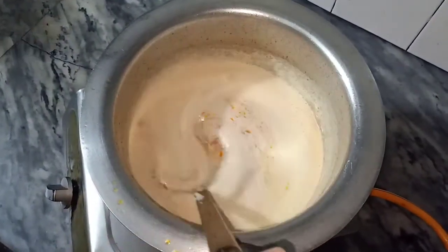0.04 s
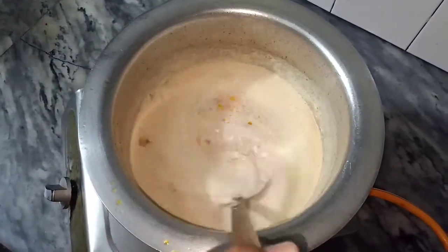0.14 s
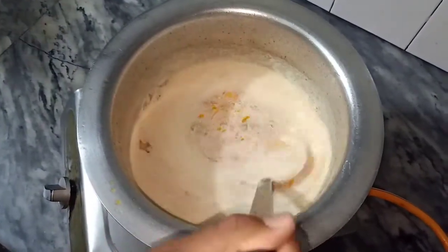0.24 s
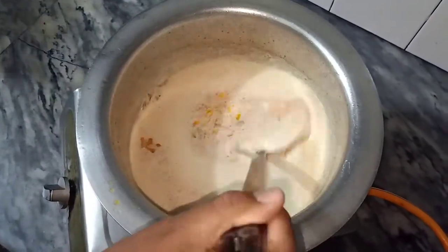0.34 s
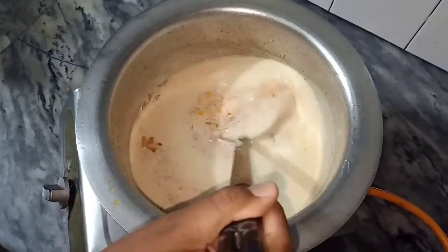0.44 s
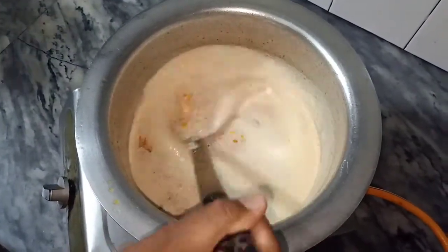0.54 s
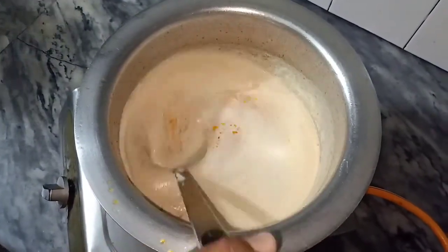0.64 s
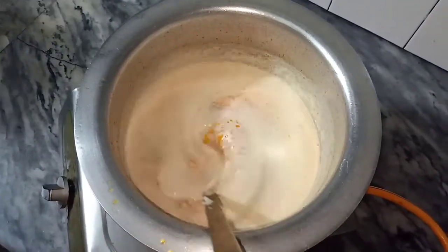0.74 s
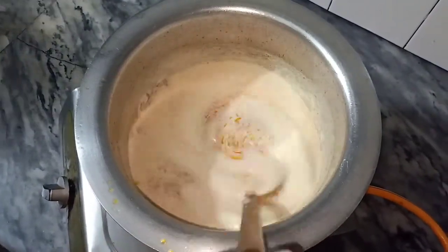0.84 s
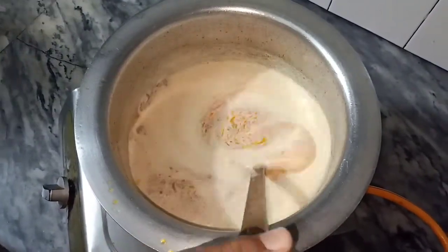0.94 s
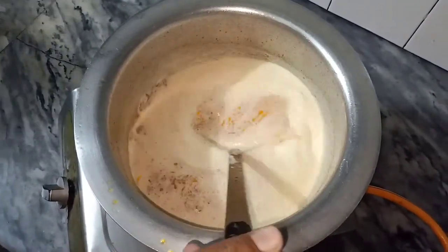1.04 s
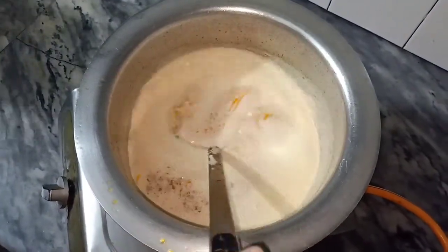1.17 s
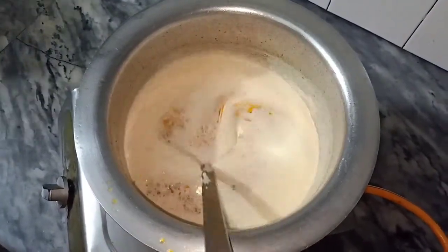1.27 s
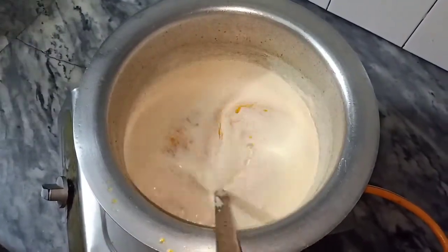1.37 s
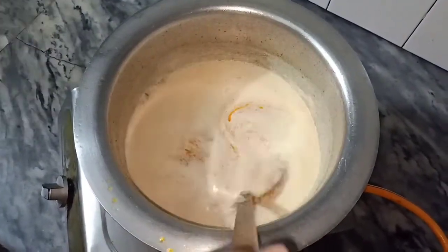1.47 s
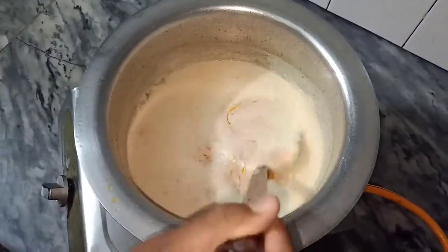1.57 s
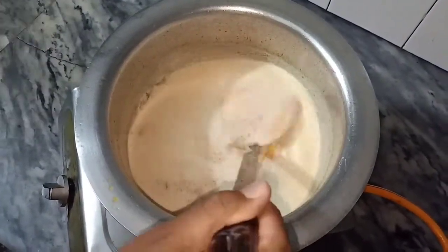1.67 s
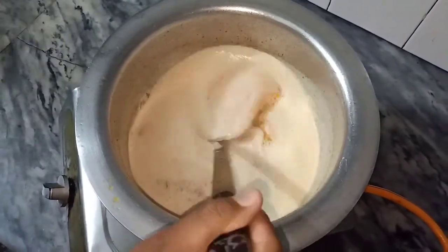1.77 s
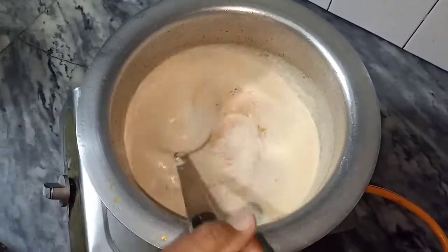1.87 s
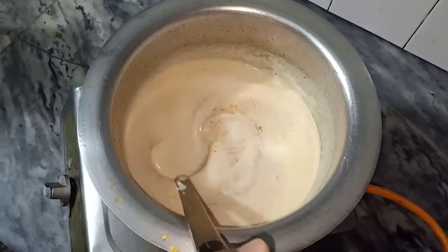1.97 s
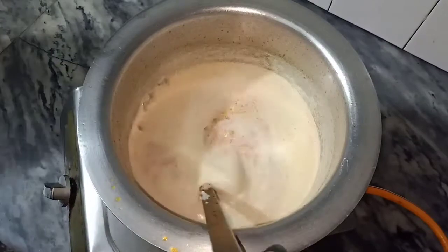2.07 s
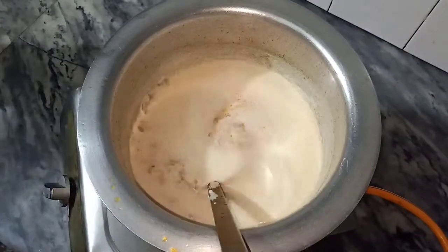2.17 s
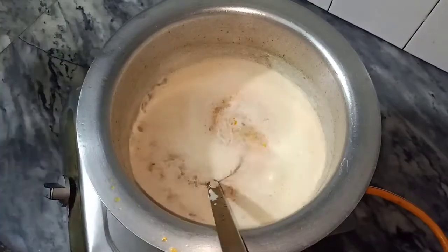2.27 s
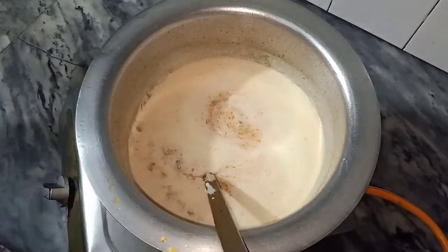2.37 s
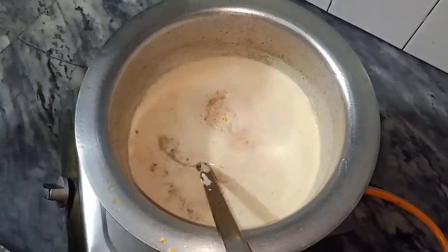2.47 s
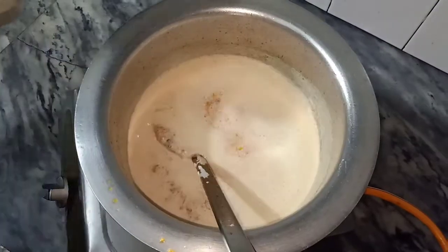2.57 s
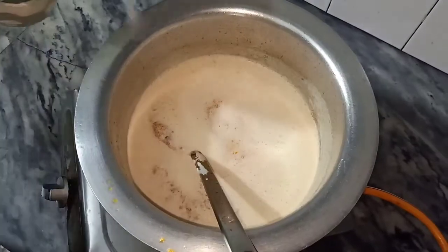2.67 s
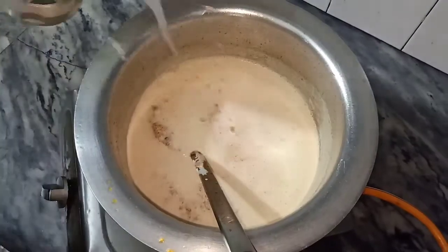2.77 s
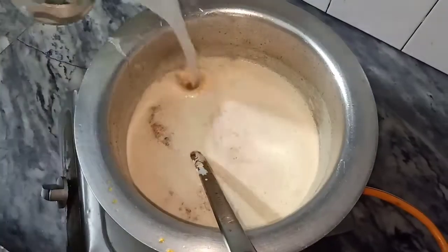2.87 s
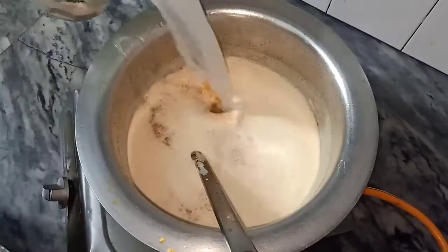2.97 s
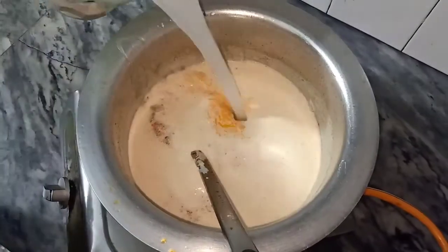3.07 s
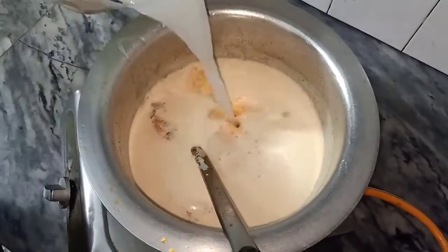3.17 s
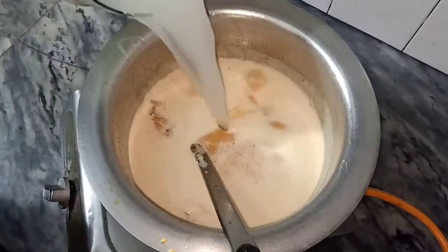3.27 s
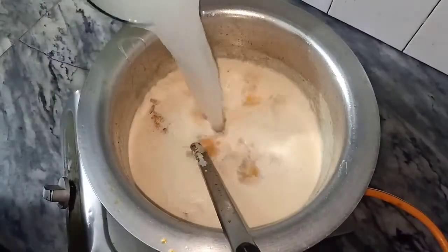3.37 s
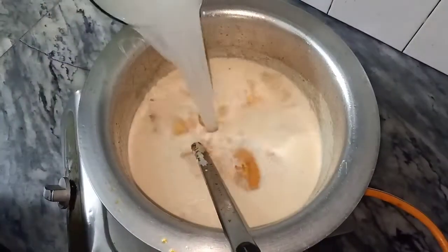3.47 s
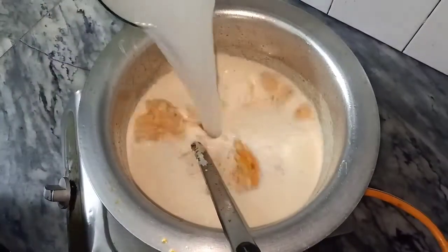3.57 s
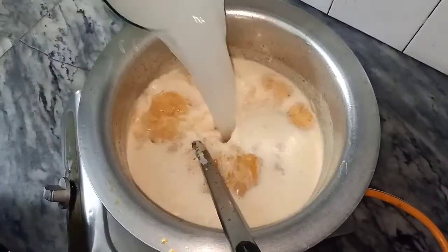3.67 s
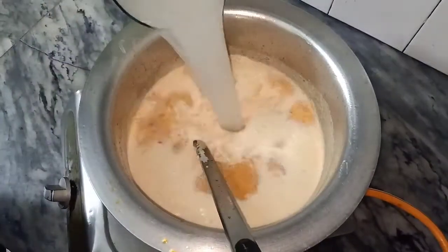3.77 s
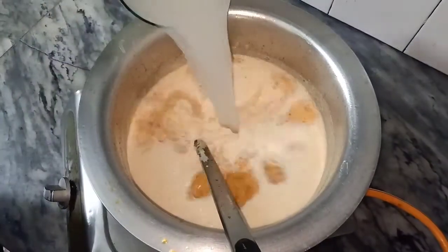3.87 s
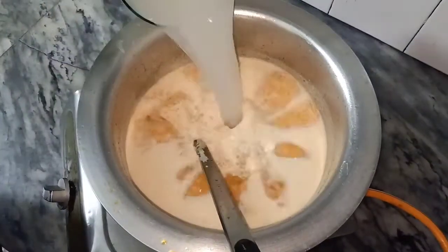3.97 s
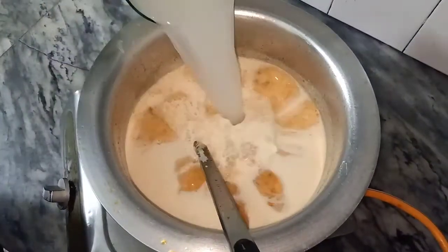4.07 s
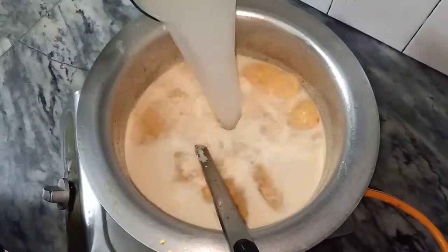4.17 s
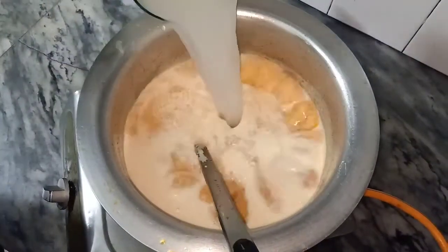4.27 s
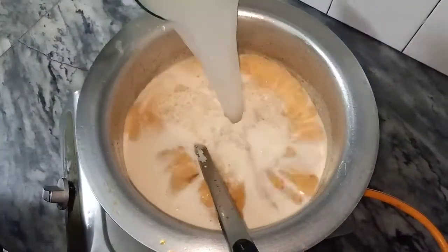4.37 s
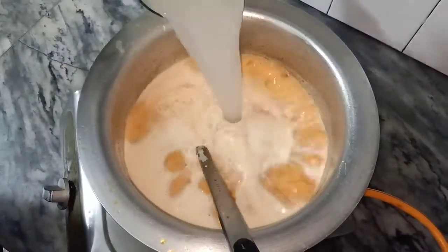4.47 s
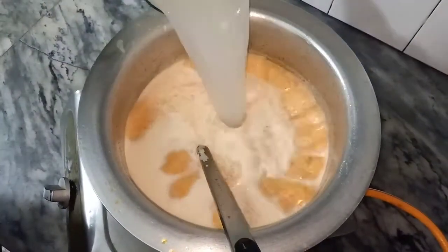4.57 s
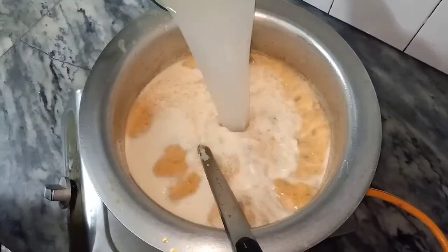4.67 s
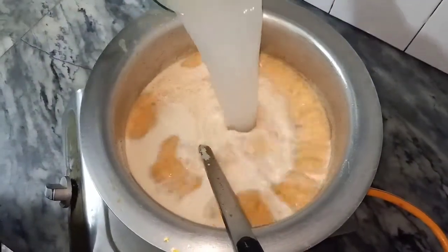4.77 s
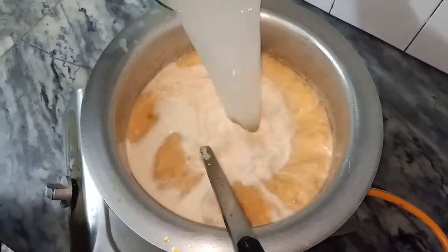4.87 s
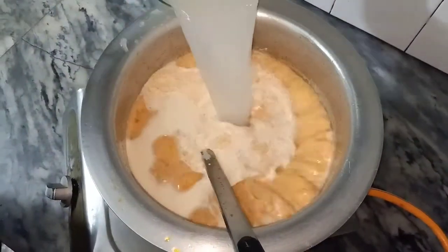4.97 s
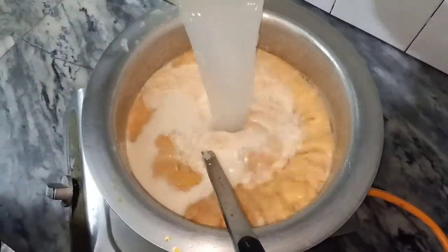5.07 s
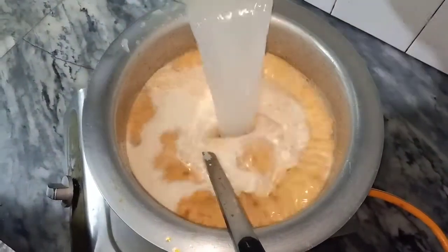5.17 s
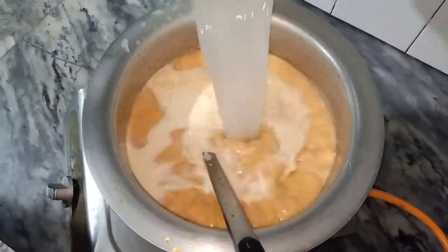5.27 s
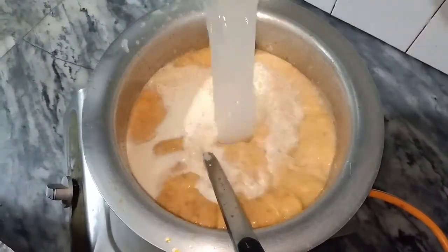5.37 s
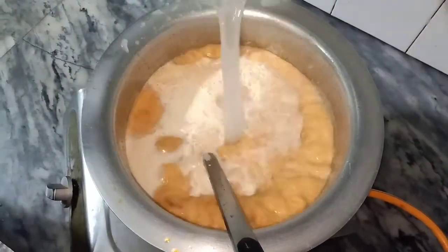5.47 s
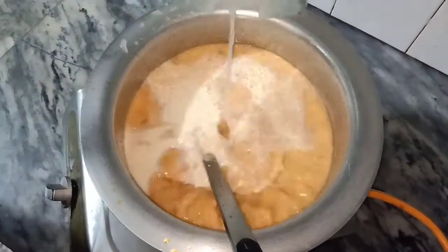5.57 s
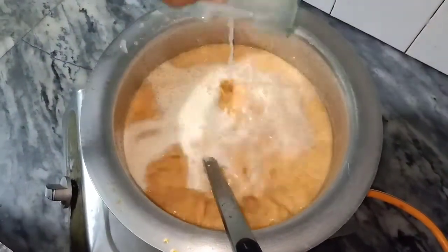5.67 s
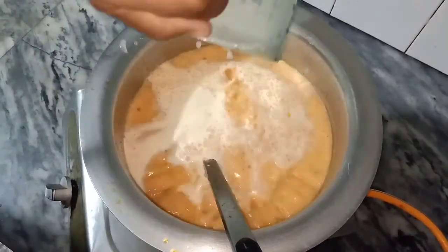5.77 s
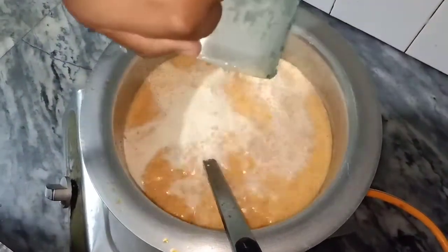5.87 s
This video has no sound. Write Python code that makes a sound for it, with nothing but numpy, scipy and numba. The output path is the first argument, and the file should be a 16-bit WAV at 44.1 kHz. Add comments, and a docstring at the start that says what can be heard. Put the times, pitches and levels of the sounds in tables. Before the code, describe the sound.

A ladle scrapes and knocks softly in a steel pot of thick liquid, then water pours in with splashes, glugs and one hard metallic clang.

```python
"""A hard kitchen: a ladle scrapes and knocks in a steel pot of thick liquid, close to a phone, then water is
poured in from a jug. Uneven slips ring the pot's damped resonances, and struck modes with a short rattle make
the knocks, one of them a hard clang. The water is swarms of gliding bubbles with splashes and big glugs on top.
Hiss and a low rumble lie behind. The left microphone port faces away and hears it all duller."""
import sys
import numpy as np
from scipy import signal
from scipy.fft import rfft, irfft
from scipy.io import wavfile
from numba import njit

SR = 44100
rng = np.random.default_rng(int(sys.argv[2]) if len(sys.argv) > 2 else 0)


def wrap_up_sound(samples):
    """Save the sound to the file named by the first command line argument, as 16-bit audio."""
    columns = np.atleast_2d(samples).T
    # keep every value between -1 and 1, then stretch to whole-number steps
    tamed = np.clip(columns, -1, 1)
    steps = np.round(tamed * 32767).astype(np.int16)
    wavfile.write(sys.argv[1], SR, steps)


N = 261954
T = np.arange(N) / SR
HZ = np.maximum(np.fft.rfftfreq(N, 1 / SR), 1)


def undb(db):
    """Decibels to a gain."""
    return 10 ** (np.asarray(db) / 20)


def unit(x):
    """Scale to rms 1."""
    return x / np.sqrt(np.mean(x ** 2))


def over_hz(table):
    """A (Hz, value) table read at every frequency, straight lines over log frequency."""
    hz, value = np.transpose(table)
    return np.interp(np.log(HZ), np.log(hz), value)


def colour(x, table):
    """Filter by a (Hz, dB) spectrum; rms 1."""
    return unit(irfft(rfft(x) * undb(over_hz(table)), N))


def causal(db):
    """Response with these levels that rings only after the sound (minimum phase)."""
    fold = irfft(np.log(undb(db)), N)
    fold[..., 1:N // 2] *= 2
    fold[..., N // 2 + 1:] = 0
    return np.exp(rfft(fold))


def band(x, lo_hz, hi_hz, order=2):
    """Keep one band of frequencies."""
    return signal.sosfilt(signal.butter(order, (lo_hz, hi_hz), "band", fs=SR, output="sos"), x)


def wander(rate):
    """Random levels 1 / rate s apart, joined by straight lines."""
    return np.interp(T * rate, np.arange(200), rng.standard_normal(200))


def gains(s, columns, rise_s=0.013, fade_s=0.43):
    """Level curves in dB as gains; outside their span they change 20 dB per rise_s or fade_s."""
    before_s = np.maximum(s[0] - T, 0)
    after_s = np.maximum(T - s[-1], 0)
    edge_db = 20 * (before_s / rise_s + after_s / fade_s)
    return [undb(np.interp(T, s, c) - edge_db) for c in columns]


def bursts(s, db, hold_s, attack_s, release_s):
    """Gain of a row of events that rise, hold and fade."""
    return sum(gains((start, start + hold), [(level, level)], attack_s, release_s)[0]
               for start, level, hold in zip(s, db, hold_s))


def ring(x, hz, t60):
    """One decaying mode driven by x."""
    pole = np.exp(2j * np.pi * hz / SR - np.log(1000) / (t60 * SR))
    return signal.lfilter([1], [1, -pole], x).imag


@njit
def bubbles(n, start, hz, cycles, size, glide, sr):
    """Each bubble is a damped sine whose pitch glides up or down by the share glide over its life."""
    out = np.zeros(n)
    for k in range(len(start)):
        life = int(3 * cycles[k] * sr / hz[k])
        phase, i0 = 0., int(start[k] * sr)
        for i in range(min(life, n - i0)):
            phase += 2 * np.pi * hz[k] * (1 + glide[k] * i / life) / sr
            swell = min(12. * i / life, 1.)
            out[i0 + i] += size[k] * swell * np.exp(-6. * i / life) * np.sin(phase)
    return out


def swarm(table, count, cycles, spread_db, glide):
    """Random bubbles across the span of a (Hz, dB) spectrum, of uneven size, coloured by it to rms 1."""
    when, where, big = rng.random((count, 3)).T
    lowest_hz, highest_hz = table[0][0], table[-1][0]
    hz = lowest_hz * (highest_hz / lowest_hz) ** where
    size = hz * undb(spread_db * np.minimum(-np.log(1 - big), 4))
    every = np.ones(count)
    return colour(bubbles(N, when * T[-1], hz, cycles * every, size, glide * every, 1. * SR), table)


# How alike the hiss, or the echo, is at the two microphone ports.
# Each row: frequency in Hz, share alike.
PORT_LIKENESS = [(60, 0.39), (300, 0.83), (700, 0.26), (1400, 0.024), (4000, 0.062)]


def pair(mid, side):
    """Left and right spectra from two unrelated ones, most alike where the shared part is largest."""
    alike = np.clip(over_hz(PORT_LIKENESS), 0, 1)
    return np.sqrt((1 + alike) / 2) * mid + np.sqrt((1 - alike) / 2) * side * np.array([[1], [-1]])


# Hiss of the kitchen around the pot. Each row: frequency in Hz, relative level in dB per Hz.
HISS_SPECTRUM = [(24, -67), (40, -43), (87, -1), (150, -10.5), (202, -5.5), (407, -9.5), (1020, -13),
                 (1730, -32), (2500, -5), (4130, -15), (5050, -16), (6100, -9.5), (7500, -23), (9000, -48),
                 (12000, -41.5), (14000, -33.5)]
HISS_DB = -65
WAVER_DB, WAVER_PER_S = 1, 10


def hiss():
    """Kitchen hiss: coloured noise whose bands, mostly third-octaves, waver each on their own."""
    noise = pair(*[rfft(colour(rng.standard_normal(N), HISS_SPECTRUM)) for _ in range(2)])
    edges_hz = np.r_[0, 1000 * 2 ** (np.arange(11) / 3), SR]
    out = 0
    for lo, hi in zip(edges_hz, edges_hz[1:]):
        one_band = irfft(noise * ((HZ >= lo) & (HZ < hi)), N)
        out = out + undb(WAVER_DB * wander(WAVER_PER_S)) * one_band
    return undb(HISS_DB) * out


# Resonances of stove and counter under the pot. Each row: frequency in Hz, width in Hz.
COUNTER_MODES = [(50, 6.9), (58, 5.2), (80, 15), (97, 10), (140, 44), (172, 8.3)]
# Jolts of stove and counter. Each row: start in seconds, level in dB, best-excited pitch in Hz,
# hold in seconds.
COUNTER_JOLTS = [(0.66, -62, 155, 0.021), (1.11, -63.5, 151, 0.042), (1.708, -67, 165, 0.022),
                 (1.943, -70.5, 146, 0.24), (2.569, -67, 93, 0.023), (3.145, -71, 159, 0.069),
                 (3.508, -50, 60, 0.075), (3.668, -64, 92, 0.15), (4.043, -38.5, 140, 0.0096),
                 (4.4, -60, 105, 0.039), (5.548, -70, 176, 0.069), (5.85, -52.5, 136, 0.046)]
JOLT_ATTACK_S, JOLT_RELEASE_S = 0.043, 0.14  # time per 20 dB
IDLE_DB = -75.5  # the rumble between jolts


def shake():
    """Low rumble of noise-driven resonances, loudest in whichever each jolt excites best."""
    s, db, pitch_hz, hold_s = np.transpose(COUNTER_JOLTS)
    best_hz = np.interp(T, s, pitch_hz)
    rumble = 0
    for hz, width_hz in COUNTER_MODES:
        focus = undb(-8.0 * np.abs(np.log2(hz / best_hz)))  # 8 dB less per octave away
        rumble = rumble + focus * unit(ring(rng.standard_normal(N), hz, 2.8 / width_hz))
    load = undb(IDLE_DB) + bursts(s, db, hold_s, JOLT_ATTACK_S, JOLT_RELEASE_S)
    return load * unit(band(rumble, 53, 220, order=3))


# Jet of water into the pot, one list before the hard blow and one after it. Each row: time in seconds,
# splash level in dB, gurgle over splash in dB, spray over splash in dB.
JET = [
    [(2.7, -68.5, 0, 2), (2.798, -71, 3.5, -5), (2.876, -63.5, 2.5, -0.5), (2.982, -50, 0, -7.5),
     (3.186, -41.5, -2.5, -8), (3.458, -53, 4.5, -6.5), (3.552, -37.5, 1.5, -8), (3.698, -43, -3.5, -13),
     (3.752, -39.5, -5, -17.5), (3.786, -47.5, -2, -8), (3.808, -47, 3.5, -6.5), (3.87, -41.5, -3.5, -9.5),
     (3.956, -47, 9.5, -1.5), (4.005, -50.5, -10, -14)],
    [(4.04, -28, 0, -14), (4.226, -43.5, -0.5, -11.5), (4.322, -41, -1.5, -6), (4.464, -63.5, -2, -12),
     (4.53, -45, -7.5, -10.5), (4.692, -47.5, -6.5, -10.5), (4.768, -53, 8, -10), (5.132, -58, -13, -14),
     (5.27, -46.5, -2.5, -13.5), (5.472, -49.5, 2.5, -16), (5.894, -51, -4.5, -6.5), (5.94, -58, -15, -11)],
]


def flow(part):
    """Gains of gurgle, splash and spray for one stretch of pouring."""
    s, splash_db, gurgle_db, spray_db = np.transpose(part)
    return gains(s, splash_db + [gurgle_db, 0 * s, spray_db])


# Spectra of the bubbles, large to tiny. Each row: frequency in Hz, relative level in dB per Hz.
GURGLE_SPECTRUM = [(130, -55.5), (220, -3.5), (320, -4), (470, 0.5), (620, 0.5), (800, -3), (1070, -1),
                   (1300, -6), (1600, -6), (2100, -2)]
SPLASH_SPECTRUM = [(710, -44), (1200, -19), (1480, -9.5), (1850, -1.5), (2100, -1), (2460, 7.5), (3920, -4),
                   (4600, -27.5), (5500, -44), (7150, -101), (12100, -120)]
SPRAY_SPECTRUM = [(4000, 9), (4900, 3.5), (6300, 8.5), (7000, -0.5), (7700, -13), (8500, -38)]
MIST_SPECTRUM = [(7000, -43), (7700, -2), (8800, -11.5), (10500, -17), (12500, -13), (14300, -6.5),
                 (15500, -13)]
# Level of the finest mist over the pot. Each row: time in seconds, level in dB.
MIST_LEVEL = [(2.7, -86), (2.82, -89), (3.06, -70), (3.08, -83), (3.17, -66.5), (3.85, -78.5), (3.94, -65),
              (4.0, -91), (4.02, -49), (4.03, -61), (4.14, -73), (4.35, -71.5), (4.49, -106), (4.52, -71.5),
              (4.63, -81.5), (5.04, -97), (5.43, -70.5), (5.59, -90), (5.77, -73.5), (5.94, -80)]
SURGE_DB, SURGE_PER_S = 2, 17  # the jet surges unevenly


def pour():
    """The jet traps swarms of bubbles, large to tiny, whose levels follow the flow; mist has its own curve."""
    s, mist_db = np.transpose(MIST_LEVEL)
    mist = gains(s, [mist_db], rise_s=.2)[0]
    surge = undb(SURGE_DB * wander(SURGE_PER_S))
    gurgle, splash, spray = np.sum([flow(part) for part in JET], axis=0) * surge
    return (gurgle * swarm(GURGLE_SPECTRUM, count=8000, cycles=8.4, spread_db=3.0, glide=0.38)
            + splash * swarm(SPLASH_SPECTRUM, count=15000, cycles=20.7, spread_db=2.0, glide=0.13)
            + spray * swarm(SPRAY_SPECTRUM, count=15000, cycles=26.0, spread_db=2.5, glide=0.076)
            + mist * swarm(MIST_SPECTRUM, count=16000, cycles=21.0, spread_db=-7.0, glide=.05))


# Splashes on the surface. Each row: start in seconds, reference level in dB, centre in Hz,
# t60 in seconds.
SLAPS = [(2.935, -28.5, 2110, 0.019), (2.986, -30, 5860, 0.043), (3.026, -35, 3460, 0.017),
         (3.21, -38, 1790, 0.028), (3.327, -34, 2620, 0.025), (3.7199, -29, 2600, 0.019),
         (3.982, -22.5, 2460, 0.026), (4.671, -30, 2230, 0.013), (4.879, -48, 2050, .03),
         (4.906, -37, 2280, 0.034), (5.042, -42, 2840, 0.024), (5.061, -35, 2560, 0.018),
         (5.2235, -39, 2500, 0.016), (5.285, -31, 2330, 0.045), (5.334, -28.5, 2690, 0.049),
         (5.394, -20.5, 2460, 0.017), (5.414, -25, 2910, 0.13), (3.039, -14, 3340, 0.027),
         (3.1035, -19.5, 2350, 0.07), (3.163, -20.5, 2820, 0.045), (3.176, -20.5, 3300, 0.024),
         (3.2382, -15.5, 3780, 0.027), (3.244, -23, 2920, .05), (3.558, -21.5, 3170, 0.071),
         (3.354, -23.5, 2430, 0.0088), (3.478, -29, 2200, 0.079), (3.545, -18.5, 2700, 0.018),
         (3.593, -20, 3000, 0.052), (3.674, -20, 2404, 0.054), (3.815, -24, 2560, 0.064),
         (3.854, -23.5, 2830, 0.14), (3.92, -22.5, 3490, 0.086), (3.941, -20, 2670, 0.048),
         (3.963, -19, 2250, 0.047), (4.214, -19, 2450, 0.061), (4.2915, -17.5, 2356, 0.071),
         (4.4803, -28.5, 2620, 0.09), (4.5202, -27, 3850, 0.017), (4.549, -17, 2383, 0.074),
         (4.55, -25.5, 2980, 0.21), (4.598, -24, 2780, 0.079), (4.7107, -28, 2340, 0.074),
         (4.7422, -25.5, 2630, 0.086), (4.796, -29, 2960, 0.067), (5.158, -36, 2580, 0.074),
         (5.2483, -26, 2190, 0.053), (5.3732, -21.5, 2080, 0.093), (5.4032, -17.5, 2400, 0.03),
         (5.5217, -28, 2220, 0.071), (5.5448, -25, 2000, 0.13), (5.601, -28, 1770, 0.019),
         (5.7217, -23, 2440, 0.0057), (5.738, -25.5, 2170, 0.0059), (5.8712, -29.5, 3270, 0.043)]
SPLAT_RISE_S = 0.0011
SPLAT_FIZZ_DB, SPLAT_BUBBLE_DB = -3, -1.5  # over the reference level


def splats():
    """The jet breaks up and slaps the surface: a short burst of fizz and a small bubble at its pitch."""
    out, t = np.zeros(N + SR), np.arange(SR // 5) / SR
    for s, level_db, hz, t60 in SLAPS:
        shape = np.minimum(t / SPLAT_RISE_S, 1) * np.exp(-np.log(1000) * t / t60)
        burst = band(rng.standard_normal(len(t)) * shape, 0.8 * hz, 1.282 * hz, order=3)
        i = int(s * SR)
        out[i:i + len(t)] += undb(level_db + SPLAT_FIZZ_DB) * burst / np.abs(burst).max()
    s, level_db, hz, t60 = np.transpose(SLAPS)
    size = undb(level_db + SPLAT_BUBBLE_DB)
    return out[:N] + bubbles(N, s, hz, 0.11 * hz * t60, size, np.full(len(s), -.05), 1. * SR)


# Air in the pot above the liquid. Each row: frequency in Hz, half width in Hz, lift or dip in dB.
POT_AIR = [(463, 70, 0.5), (794, 25, -3), (1090, 54, 4.5), (1470, 220, 0.5), (1886, 16.4, 3.5),
           (2340, 62, 1), (3004, 32, 2.5), (3530, 49, 4), (4060, 38, 4.5)]


def hollow(x):
    """The pot's air resonances lift and dip the sound of the water inside it."""
    lift_db = sum(db / (1 + ((HZ - hz) / width) ** 2) for hz, width, db in POT_AIR)
    return irfft(rfft(x) * causal(lift_db), N)


# Big bubbles and sloshes in the pot. Each row: start in seconds, level in dB, pitch in Hz,
# cycles until it has died to about a seventh, glide as a share of the pitch.
BIG_BUBBLES = [(.008, -37.5, 255, 8.3, -0.078), (.012, -34, 545, 3.1, -0.62), (.037, -35, 262, 4.1, -0.18),
               (.14, -44.5, 490, 19, -0.54), (0.203, -38.5, 328, 5.6, -0.17), (.3, -48, 328, 5.2, -0.22),
               (.35, -43, 480, 12, -0.051), (.375, -42.5, 233, 8, -0.032), (0.416, -34, 429, 11, 0.21),
               (.452, -41, 243, 3.7, 0.55), (.51, -38, 480, 7.2, 0.8), (.56, -37, 598, 10, 0.093),
               (0.604, -33, 232, 4.6, -0.43), (0.636, -36, 237, 8, .05), (.676, -22.5, 460, 7, -0.31),
               (0.68, -35.5, 238, 5.9, -0.34), (.72, -34, 247, 6, -0.46), (.75, -41, 208, 3.5, -0.83),
               (.755, -34, 1510, 12, 0.1), (.81, -40, 1390, 33, -0.23), (0.849, -51, 270, 4.7, -0.41),
               (.97, -48, 238, 7.8, -0.082), (1.03, -45.5, 252, 8.8, 0.12), (1.083, -28, 575, 7.8, 0.07),
               (1.124, -22, 420, 2.5, -0.54), (1.19, -38.5, 414, 5.3, -.2), (1.22, -42, 416, 7, -0.032),
               (1.161, -27, 432, 8.8, -0.18), (1.708, -38.5, 244, 11, -0.011), (1.755, -45, 232, 5, 0.078),
               (1.968, -31, 570, 5.4, 0.42), (1.974, -34, 229, 4.2, 0.29), (2.109, -36.5, 1072, 19, -0.014),
               (1.995, -38.5, 335, 9, 0.17), (2.03, -38.5, 345, 4.3, -0.15), (2.065, -41, 339, 17.4, -0.26),
               (2.15, -39.5, 330.5, 12, 0.2), (2.185, -55, 342, 8, -0.036), (2.462, -24, 566, 4.2, -1.1),
               (2.62, -47.5, 492, 17, 0.021), (2.765, -42, 479, 7.6, 0.32), (2.797, -36.5, 474, 10, -0.14),
               (3.061, -17.5, 508, 4.8, -0.3), (3.11, -36, 536, 4.9, -0.22), (3.297, -28, 654, 2.8, 0.53),
               (3.152, -18.5, 575, 1.9, -0.18), (3.174, -17.5, 1040, 3.8, -0.072),
               (3.323, -31, 590, 4.3, 0.65), (3.536, -17.5, 514, 5.4, 0.28), (3.651, -26.5, 1008, 17, 0.58),
               (3.741, -15.5, 660, 3.8, 0.12), (3.862, -26, 594, 6.6, 0.063), (3.919, -25, 590, 8.6, 0.17),
               (3.936, -27, 595, 2.9, .1), (3.96, -29, 507, 5.6, 0.16), (4.297, -30, 1020, 10, -0.26),
               (4.486, -36.5, 985, 70, -1.3), (4.532, -25.5, 1090, 7.7, 0.081),
               (4.575, -17.5, 1090, 1.54, 0.091), (4.751, -21, 740, 4.9, -0.33),
               (4.761, -22.5, 1020, 5.1, 0.29), (4.62, -30.5, 960, 6, -.1), (4.732, -30, 880, 7.2, 0.2),
               (4.815, -33, 900, 7.6, -0.64), (4.772, -32, 910, 3.7, -.1), (4.785, -26, 720, 3.4, -0.021),
               (5.24, -25.5, 1090, 3, 0.25), (5.325, -27, 910, 4.1, 0.27), (5.412, -17, 706, 1.6, 0.0071),
               (5.428, -24.5, 850, 5.4, -0.011), (5.434, -38, 249, 10, -0.052),
               (5.565, -39.5, 251, 6.3, -0.31), (5.538, -29.5, 723, 11, 0.74), (5.747, -41, 250, 16, -0.19),
               (5.836, -31.5, 1390, 7.9, 0.12), (5.837, -29, 124, 0.93, 0.28),
               (5.861, -28.5, 940, 4.3, 0.98), (5.872, -32, 350, 2.5, -0.47), (5.886, -43, 138, 1.4, -0.11),
               (5.916, -31, 173, 0.99, -0.37)]


def glugs():
    """The biggest bubbles stand out alone, each a damped gliding sine."""
    s, level_db, hz, cycles, glide = np.transpose(BIG_BUBBLES)
    return bubbles(N, s, hz, cycles, undb(level_db), glide, 1. * SR)


# Ladle on the bottom of the pot. Each row: time in seconds, drag level in dB, grit over drag in dB,
# best-excited low resonance in Hz.
LADLE_DRAG = [(0.0, -65, 16, 274), (0.25, -59.5, 4, 412), (0.56, -48, 3, 554), (0.608, -40.5, -8, 289),
              (0.68, -35.5, -19, 450), (0.739, -52, 2.5, 300), (1.03, -51, -4, 293),
              (1.09, -50.5, 3.5, 474), (1.2, -51, -2.5, 417), (1.3, -69.5, 1, 326),
              (1.561, -62.5, -5.5, 363), (1.702, -44.5, -4, 255), (1.799, -44.5, -9, 425),
              (1.909, -42, -3, 374), (2.05, -50, -11, 344), (2.25, -57, 1.5, 330), (2.31, -70, 6, 330),
              (2.49, -79, 30.5, 504), (2.6, -68, 5.5, 557), (2.66, -60.5, 4.5, 438),
              (2.95, -61.5, 7.5, 493)]
# Pot full of liquid. Each row: resonance in Hz, width in Hz, level in dB.
POT_MODES = [(181, 30, -28), (253, 20, 1.5), (336, 15, -13), (472, 270, 0), (584, 6, 5), (597, 150, 4),
             (840, 94, -25), (1072, 68, -12), (1330, 110, -25), (1750, 120, -14), (2085, 225, -6),
             (2433, 100, -8), (2726, 120, -8), (3008, 56, -5), (3310, 200, -13.5), (3670, 520, -25.5),
             (4780, 300, -24.5), (5980, 1000, -23)]
# Quick swishes of the ladle on the wall. Each row: start in seconds, rasp level in dB,
# grit level in dB, hold in seconds.
WALL_SWISHES = [(0.02, -82, -56, 0.0048), (0.364, -53, -59.5, 0.082), (0.434, -50, -67, 0.042),
                (0.613, -74, -49, 0.048), (1.026, -49, -52.5, 0.032), (1.959, -45.5, -51.5, 0.034),
                (2.115, -44, -53.5, 0.0097), (2.135, -56, -58, 0.043), (2.236, -64, -52, 0.017)]
SWISH_ATTACK_S, SWISH_RELEASE_S = 0.0061, 0.0057  # time per 20 dB
# Bubbles folded in by the ladle. Each row: frequency in Hz, relative level in dB per Hz.
SLOSH_SPECTRUM = [(170, -6), (240, -1), (450, -5.5), (750, -13.5)]
SLOSH_DB = -6.5  # over the drag
# the rasp in the wall follows drag and grit: dB at the reference level, dB per dB of each
RASP_DB, RASP_REF_DB, RASP_PER_DRAG, RASP_PER_GRIT = -53.5, -50.5, 0.72, 0.66


def scrape():
    """Dense uneven slips of the ladle ring the pot's broad resonances, low, middle and high; the liquid sloshes."""
    s, drag_db, grit_db, pitch_hz = np.transpose(LADLE_DRAG)
    grit_db = drag_db + grit_db
    rasp_db = (RASP_DB + RASP_PER_DRAG * (drag_db - RASP_REF_DB)
               + RASP_PER_GRIT * (grit_db - RASP_REF_DB))
    best_hz = np.interp(T, s, pitch_hz)
    drag, rasp, grit = gains(s, (drag_db, rasp_db, grit_db))
    when, *swish_db, hold_s = np.transpose(WALL_SWISHES)
    swish_rasp, swish_grit = [bursts(when, db, hold_s, SWISH_ATTACK_S, SWISH_RELEASE_S) for db in swish_db]
    # gain, band in Hz, dB lost per octave from the best resonance, random change of each mode in dB
    layers = [(drag, 150, 750, 22.0, 6.5), (rasp + swish_rasp, 750, 1600, 0, 6.5),
              (grit + swish_grit, 1600, 7000, 0, 4)]
    out = 0
    for gain, lo_hz, hi_hz, focus_db, vary_db in layers:
        slips = rng.standard_normal(N)
        slips = slips * undb(1.32 * np.minimum(rng.exponential(size=N), 4))
        slips = slips * (rng.random(N) < .1)  # about one sample in ten slips
        body = 0
        for hz, width_hz, db in POT_MODES:
            if lo_hz <= hz < hi_hz:
                # where the ladle touches changes which resonances speak
                speak_db = db + vary_db * wander(14.0) - focus_db * np.abs(np.log2(hz / best_hz))
                body = body + undb(speak_db) * np.sqrt(width_hz) * unit(ring(slips, hz, 1.62 / width_hz))
        out = out + gain * unit(band(body, lo_hz, hi_hz, order=3))
    slosh = swarm(SLOSH_SPECTRUM, count=500, cycles=6.6, spread_db=4.5, glide=-0.11)
    return out + drag * undb(SLOSH_DB) * slosh


# Blows on the pot, and taps of the handle on its rim. Each row: start in seconds, clang level in dB,
# best-excited pitch in Hz, damping as a divisor of ring times, rattle in milliseconds,
# crack as a share of the clang, dull knock level in dB.
POT_BLOWS = [(0.013, -34.5, 2280, 19, 2.1, 0.88, -39), (0.339, -34.5, 1030, 1.3, 1.3, 0.42, -44.5),
             (0.675, -25, 800, 10, 1.9, 0.15, -27), (1.086, -26.5, 686, 8.3, 1.5, 0.22, -37),
             (1.715, -38, 2200, 1.44, 24, 0.55, -38), (2.234, -39, 2400, 5.6, 2.5, 0.54, -67),
             (4.011, -6, 1210, 2.1, 63.5, 1, -24)]
RIM_TAPS = [(1.123, -21, 2570, 4.4, 2.5, 0.16, -32), (1.154, -33, 2200, 5, 4.7, .1, -55),
            (2.449, -58, 1210, 1.9, 0.56, 0.68, -45.5), (2.460, -18, 2200, 0.98, 3.6, 0.04, -38.5)]
# Struck steel of the pot, and handle of the ladle. Each row: mode in Hz, relative level in dB,
# t60 in seconds before damping and the cap longest_s.
POT_STEEL = [(446, 3, 0.43), (497, 7, .3), (910, -9.5, 0.14), (915, -6.5, 0.38), (937, -0.5, .3),
             (990, -4.5, .25), (1023, 1, .25), (1085, 12.5, 0.24), (1127, -5.5, 0.27), (1290, -8, .5),
             (1540, -10, .39), (1570, 0, 0.48), (1645, -8, 0.3), (1960, 0.5, 0.6), (2165, 6, .31),
             (2150, 17.5, .25), (2260, 12, .24), (2347, -11, 0.59), (2380, 10.5, .21), (2670, 4.5, .25),
             (2600, 2.5, .4), (2850, 5, .2), (2850, 5.5, .3), (3160, 4, 0.38), (3500, -0.5, .35),
             (3600, 3, .23), (3930, -6, .3), (4280, -18, .3), (5152, -9.5, .24), (5669, -6, .41),
             (6100, -7, .3)]
LADLE_HANDLE = [(556, 12.5, 0.034), (1342, -6.5, 0.26), (1765, -15, 0.54), (1940, -20, 0.67),
                (2130, -13, 0.26), (2180, -17, 2.2), (2196, -20.5, 1.5), (2204, 14, 0.051),
                (2850, -14.5, 0.25), (3365, -13, 0.17), (5000, -5.5, 0.069), (6080, -24, .06)]
# Colour of the crack through the pot's wall. Each row: frequency in Hz, level in dB.
WALL_CRACK = [(250, -25), (450, 0.5), (600, -10.5), (750, -21.5), (900, -0.5), (1080, -3), (1250, -23),
              (1850, -19), (2150, 4.5), (3000, -2), (3300, -9.5), (3700, -5.5), (4400, -14), (7000, -15.5),
              (12000, -28.5)]


def knocks(blows, steel, longest_s=0.58, first=5.3, swell=0):
    """Each blow rattles briefly, rings the modes near its best pitch, and the liquid thumps."""
    out, t = np.zeros(N + SR), np.arange(SR // 2) / SR
    hz, db, t60 = np.transpose(steel)[:, :, None]
    wall = causal(over_hz(WALL_CRACK))
    for s, clang_db, best_hz, damping, rattle_ms, crack_share, dull_db in blows:
        size = undb(db - 4.2 * np.log2(hz / best_hz) ** 2 + 0.5 * rng.standard_normal(hz.shape))
        rattle = rng.standard_normal(len(t)) * np.exp(-(t * 1000 / rattle_ms - swell) ** 2)
        rattle[0] = first  # strength of the first contact
        # undo the rattle's own spectrum, so each mode keeps its level
        size = size / np.abs(np.exp(2j * np.pi * hz * t) @ rattle)[:, None]
        decay = np.exp(-np.log(1000) * t * damping / np.minimum(t60, longest_s))
        modes = np.sum(size * decay * np.sin(2 * np.pi * hz * t), axis=0)
        clang = signal.fftconvolve(rattle, modes)[:len(t)]
        crack = irfft(rfft(rattle, N) * wall, N)[:len(t)]
        thump = band(rng.standard_normal(len(t)) * np.exp(-t * damping / 0.064), 467, 740)
        blow = clang / np.abs(clang).max() + crack_share * crack / np.abs(crack).max()
        i = int(s * SR)
        out[i:i + len(t)] += undb(clang_db) * blow + undb(dull_db) * thump / np.abs(thump).max()
    return out[:N]


# Tone filter for ladle, knocks, glugs and splashes: little deep bass, treble dulled steeply above 7 kHz.
# Each row: frequency in Hz, level in dB.
TONE_FILTER = [(40, -45.5), (120, -30.5), (170, -0.5), (6600, -3.5), (7600, -10), (8600, -21.5),
               (11000, -24), (14000, -27.5)]


def dull_ends(x):
    """Dull the lowest and highest frequencies."""
    return irfft(rfft(x) * causal(over_hz(TONE_FILTER)), N)


ROOM_T60_S, ROOM_DB = 0.19, -10.5


def kitchen(x, lag_s):
    """The direct sound, delayed at the left port by lag_s, and the dense echo of tiled walls."""
    tail = rng.standard_normal((2, N)) * np.exp(-np.log(1000) * T / ROOM_T60_S) * (T > .003)
    echo = pair(*rfft(tail / np.sqrt(np.sum(tail ** 2, axis=1, keepdims=True))))
    direct = np.exp(-2j * np.pi * HZ * lag_s * np.array([[1], [0]]))
    # facing away, the left port trades direct sound for echo above the bass
    turned = undb(13 * HZ / (HZ + 400))
    right = 1 + 0 * HZ
    heard = direct / [turned, right] + undb(ROOM_DB) * echo * [turned ** 0.79, right]
    return irfft(rfft(x) * heard, N)


LAG_S = -0.00024  # blows and water reach the left port first


def scene():
    """Ladle, blows and water in the kitchen, over its rumble and hiss."""
    stirring = scrape()
    taps = knocks(RIM_TAPS, LADLE_HANDLE, longest_s=1.8, first=0.35, swell=1.4)
    ladle = kitchen(dull_ends(stirring + taps), 0)
    blows = kitchen(dull_ends(knocks(POT_BLOWS, POT_STEEL) + glugs()), LAG_S)
    water = kitchen(hollow(dull_ends(splats()) + pour()), LAG_S)
    return ladle + blows + water + shake() + hiss()


# Microphone ports of the phone. Each row: frequency in Hz, left minus right in dB.
PORT_BALANCE = [(60, -3), (200, 5), (380, 3.5), (700, 3.5), (1290, -0.5), (2380, -7.5), (4400, -14),
                (8120, -26.5), (15000, -12)]
TOP_HZ, CEILING = 15600, .95


def record(dry):
    """The phone's body shades the left port in the treble; the loudest peaks are rounded and the top is cut."""
    left_db = over_hz(PORT_BALANCE)
    both_db = 10 * np.log10((1 + undb(2 * left_db)) / 4)  # holds the ports' summed power gain even
    shaded = irfft(rfft(dry) * causal(np.array([left_db, 0 * HZ]) - both_db), N)
    rounded = CEILING * np.tanh(shaded / CEILING)
    return signal.sosfilt(signal.ellip(10, .2, 70, TOP_HZ, fs=SR, output="sos"), rounded)


dry = scene()
out = record(dry)
wrap_up_sound(out)
```